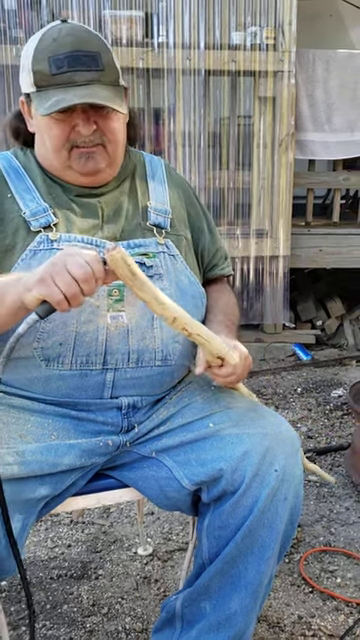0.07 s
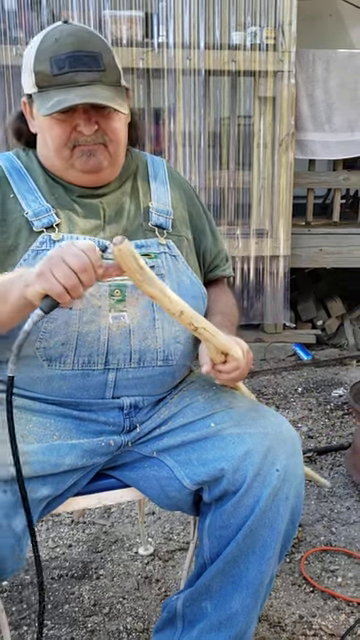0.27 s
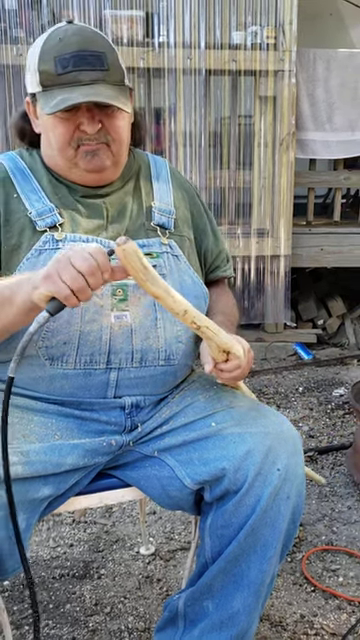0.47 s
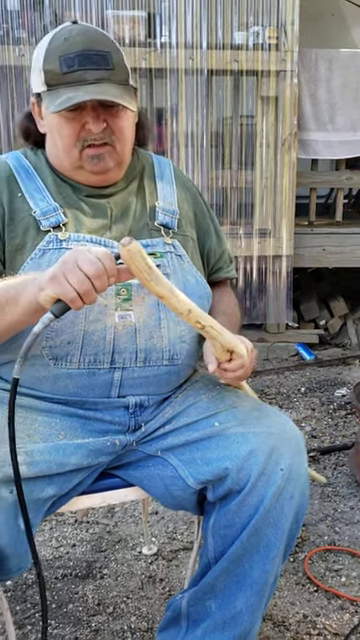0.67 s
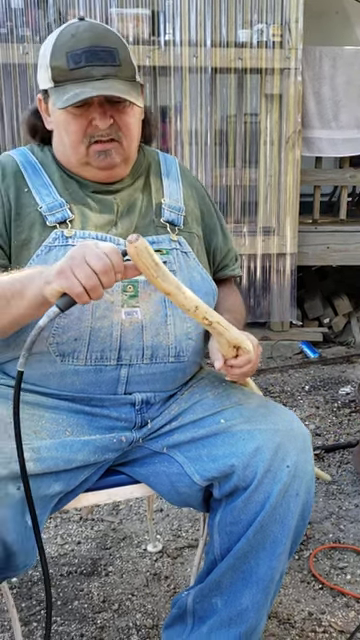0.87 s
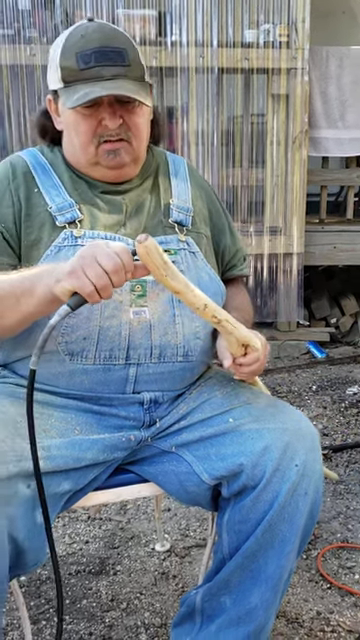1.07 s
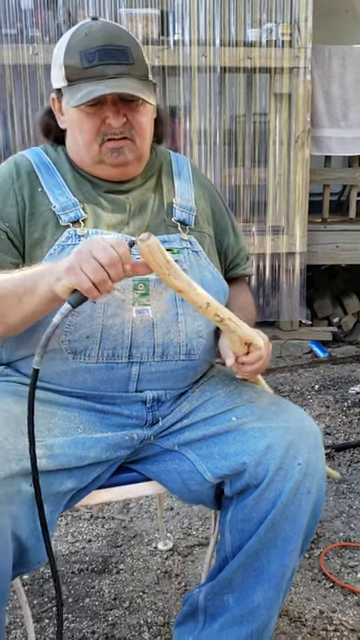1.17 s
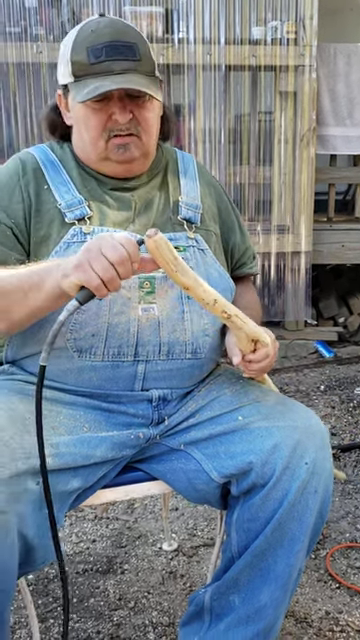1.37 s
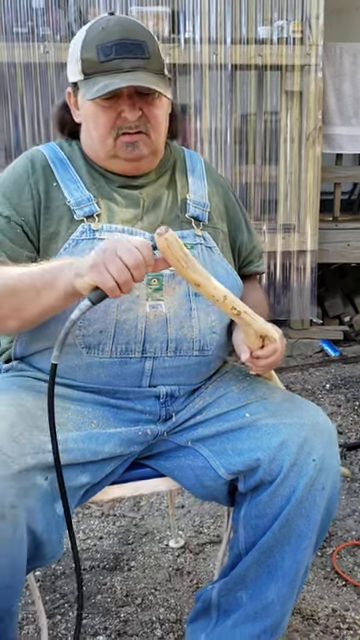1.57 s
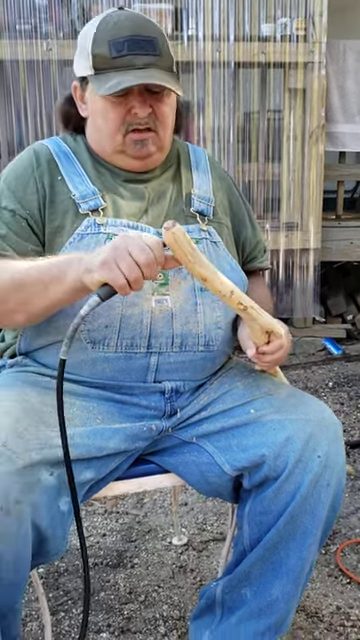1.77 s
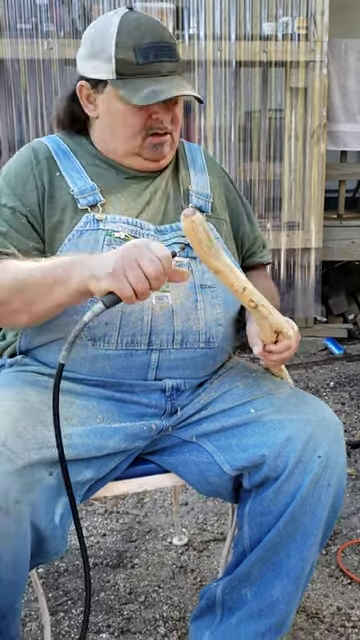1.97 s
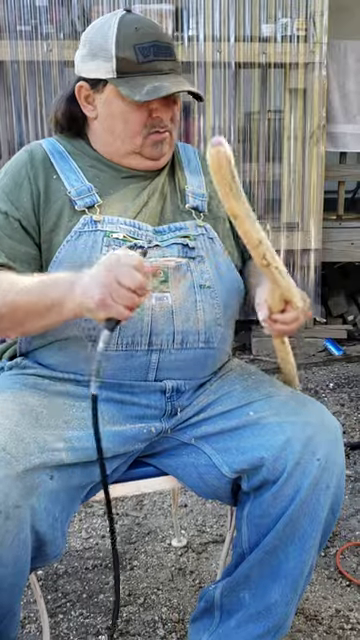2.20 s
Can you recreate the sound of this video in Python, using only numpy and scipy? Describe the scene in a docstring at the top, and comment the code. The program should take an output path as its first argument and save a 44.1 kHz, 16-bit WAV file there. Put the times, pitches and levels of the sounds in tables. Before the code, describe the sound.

A rotary tool grinds a wooden stick outdoors, close and louder on the left. Its steady whine, high fan whistle, airy hiss and shaft rattle run throughout. The gritty scrape squeals around 0.3 s, briefly lightens, then resumes. Sharper squeals come at 1.1 and 1.3 s as the pitch sags slightly; grinding stays hard until about 1.8 s, then eases as the motor speeds up. Faint hum and rumble lie beneath.

```python
"""Outdoors, before two microphones: a rotary tool on a flexible shaft grinds a wooden stick, louder on the left.
The bit scrapes the wood in a pattern that nearly repeats each turn, bites harder now and then, and squeals.
Noise coloured by the wood and the bit makes the scrape; sines at multiples of the shaft speed make the squeals.
The motor whines, its fan sings, and filtered noise makes the air rush and the shaft's rattle in its sheath.
A sine of mains hum and a band of low rumble lie beneath. The shaft speed sags and recovers along a set curve."""
import sys
import numpy as np
from scipy import signal
from scipy.fft import rfft, irfft, next_fast_len
from scipy.io import wavfile
from scipy.ndimage import map_coordinates

SR = 44100
rng = np.random.default_rng(int(sys.argv[2]) if len(sys.argv) > 2 else 0)


def dump(signal):
    """Clip the signal to [-1, 1] and save it as 16-bit WAV at the path in sys.argv[1]."""
    limited = np.clip(np.atleast_2d(signal).T, -1, 1)
    pcm = np.round(limited * 32767).astype(np.int16)
    wavfile.write(sys.argv[1], SR, pcm)


N = 98651

# Shaft speed before flutter. Each row: time in seconds, speed in Hz.
SHAFT_SPEED = [(0.02, 505.7), (0.16, 507.1), (0.25, 504.5), (0.31, 500.0), (0.345, 494.1), (0.55, 493.9),
               (0.79, 495.7), (0.88, 494.1), (1.05, 496.0), (1.1, 492.9), (1.27, 492.0), (1.335, 481.2),
               (1.4, 479.0), (1.5, 480.2), (1.59, 478.5), (1.73, 481.4), (1.81, 479.8), (2.22, 497.3)]
FLUTTER_HZ, FLUTTER_KNOTS_PER_S = 0.385, 35

# Pressure of the bit on the wood. Each row: time in seconds, level in dB.
PRESSURE_LEVEL = [(0, -10), (.1, -4), (.22, -4), (.27, -6), (.34, -24), (.41, 0.5), (.5, 1), (.57, -8.5),
                  (.68, -2.5), (.8, -1.5), (.92, -1.5), (1.08, -1.5), (1.19, 2), (1.3, -3.5), (1.42, 3),
                  (1.53, 0.5), (1.64, 0), (1.76, 0.5), (1.87, -2.5), (1.98, -3), (2.08, -10), (2.24, -15)]
# Harder bites. Each row: centre in seconds, half length in seconds (power down to 1/e), wood in dB, bit in dB.
HARD_BITES = [(0.311, 0.03, 8, 10.5), (0.373, 0.0065, 4, 8), (0.473, 0.0091, 4, -8),
              (0.634, 0.0088, 0, 7.5), (0.866, 0.01, -5, 5), (1.075, 0.016, 6, 5.5), (1.3, .021, 8, 8),
              (1.353, 0.011, 8, 6.5), (1.779, 0.011, 4, 9.5)]
# Scrape in the wood at 0 dB drive, near the left microphone. Each row: frequency in Hz, level in dB per Hz.
WOOD_SPECTRUM = [(900, -105), (1550, -76), (1920, -72), (2400, -73), (2700, -70.5), (3000, -74.5),
                 (3500, -73), (4000, -71), (4600, -80.5), (5500, -84), (6200, -105)]
# Scrape in the bit at 0 dB drive, near the left microphone. Each row: frequency in Hz, level in dB per Hz.
BIT_SPECTRUM = [(4500, -105), (5900, -89), (6500, -75), (7000, -74.5), (7600, -85.5), (8400, -77.5),
                (9400, -79.5), (10200, -77.5), (11200, -81), (12400, -95.5), (13200, -81), (13750, -87.5),
                (14200, -84), (14900, -81.5), (16000, -94)]
# Scrape at the right microphone. Each row: frequency in Hz, right minus left in dB.
SCRAPE_SHADE = [(2000, -8), (3000, -11), (3500, -45), (4200, -2), (5000, -14), (6500, -6.5), (6950, -13.5),
                (7600, -29), (10300, -18.5), (12500, -17), (13800, 6), (15000, -18)]
# Buzz of the scrape at 0 dB pressure, before waver.
# Each row: multiple of shaft speed, left level in dB, right level in dB, left lead in radians.
BUZZ_TONES = [(6, -47, -60, -1.2), (7, -45.5, -58, 2), (8, -48.5, -73, -4.7), (9, -54, -57, 1.3)]
# Bit resonances at 0 dB ringing.
# Each row: centre in Hz, half width in Hz (amplitude halved), left peak in dB per Hz.
BIT_RESONANCES = [(6440, 96, -70.5), (7110, 250, -64.5), (13800, 300, -72)]
# The bit's ringing. Each row: time in seconds, level in dB.
RINGING_LEVEL = [(0, -40), (.2, -7.5), (.3, 0.5), (.4, -8), (.5, -4), (.57, -21), (.65, -12.5), (.85, -7),
                 (.95, -14), (1.08, -2.5), (1.19, -13), (1.32, -3), (1.4, -24)]
# Ringing at the right microphone. Each row: frequency in Hz, right minus left in dB.
RINGING_SHADE = [(6480, -5), (6950, -8), (13830, -4)]
# Squeals of the bit on the wood, before waver. Each row: start in seconds, end in seconds,
# multiple of shaft speed, left level in dB, right level in dB, slip in cycles.
SQUEAL_EVENTS = [(0, 0.046, 4, -45, -50, .03), (0.25, .345, 7, -36.5, -54, .02),
                 (0.255, 0.33, 13, -40, -58, .07), (.255, .32, 9, -42, -58, .03),
                 (.275, .34, 8, -38.5, -50, .02), (0.289, 0.337, 6, -34, -44, .02),
                 (.46, 0.525, 6, -41, -58, 0.023), (1.056, 1.168, 7, -37.5, -57, .04),
                 (1.17, 1.33, 28, -50, -47, .38), (1.22, 1.236, 14, -39, -55, .05),
                 (1.284, 1.322, 6, -32.5, -49, .02), (1.29, 1.327, 7, -36.5, -56, .04),
                 (1.302, 1.374, 8, -41, -58, 0.12), (1.337, 1.372, 14, -39, -47, 0.2),
                 (1.623, 1.662, 7, -33.5, -52, .04), (1.5, 1.71, 14, -41, -49.5, 0.036),
                 (1.717, 1.863, 14, -48, -52, 0.15), (1.769, 1.786, 8, -31, -50, 0.036),
                 (1.96, 2.04, 4, -45.5, -50, .03)]
SQUEAL_RISE_S, SLIP_KNOTS_PER_S = 0.011, 60

# Lesser motor tones, before waver. Each row: multiple of shaft speed, left level in dB, right level in dB,
# left lead in radians, unsteadiness in dB (its sign only flips the random waver).
MOTOR_TONES = [(1, -63, -67, 0.47, 3), (3.91, -62.5, -53, 0.6, 3), (4, -93, -59.5, 1, -3),
               (4.09, -65.5, -56.5, -0.1, 6), (5, -51.5, -51.5, 4.5, 4)]
# Main whine at twice the shaft speed. Each row: time in seconds, left level in dB.
WHINE_LEVEL = [(0, -45.5), (.28, -48), (.4, -45), (.8, -46), (1.15, -43), (1.33, -47.5), (1.88, -47.5),
               (2.24, -49)]
WHINE_RIGHT_DB, WHINE_LEAD_RAD = -11, -2.07  # right minus left; left lead
# Overtone at three times the shaft speed, before waver.
# Each row: time in seconds, left level in dB, right level in dB.
OVERTONE_LEVELS = [(0, -40.5, -45.5), (.25, -38, -42.5), (.34, -51, -49.5), (.6, -49.5, -49),
                   (.72, -42.5, -45), (1.5, -44.5, -45.5), (1.95, -45, -47), (2.24, -43, -45)]
OVERTONE_LEAD_RAD, OVERTONE_WAVER_DB = 3.37, 5
# Fan whistle. Each row: time in seconds, left level in dB.
FAN_LEVEL = [(0, -40), (.45, -40.5), (1.05, -38), (1.25, -37.5), (1.37, -35.5), (1.7, -36.5), (1.83, -40.5),
             (2.02, -37), (2.24, -40)]
FAN_BLADES, FAN_RIGHT_DB, FAN_LEAD_RAD = 18, -14, 1  # right minus left; left lead
# Rush of air at the left microphone. Each row: frequency in Hz, level in dB per Hz.
AIR_SPECTRUM = [(150, -90), (270, -85), (420, -92.5), (590, -84), (720, -89), (1700, -84.5), (3000, -86.5),
                (5200, -84), (5950, -90.5), (6400, -85.5), (7000, -81.5), (8000, -77), (10200, -79),
                (11500, -86), (14200, -87), (15200, -80.5), (16000, -79)]

# Shaft rattle at 0 dB chatter, at the left microphone. Each row: frequency in Hz, level in dB per Hz.
RATTLE_SPECTRUM = [(400, -100), (1050, -84.5), (1350, -82), (1640, -80), (1880, -74.5), (2150, -76),
                   (2380, -70), (2700, -79.5), (2900, -72), (3400, -73), (3670, -65.5), (3900, -72.5),
                   (4450, -77), (5200, -86.5), (5900, -94), (9000, -100)]
# Shaft chatter before its random flicker. Each row: time in seconds, level in dB.
CHATTER_LEVEL = [(0, 4.5), (.2, 1.5), (.45, 1.5), (.56, 0), (.61, -2), (.69, 2), (.85, -1.5), (.95, 3.5),
                 (1.15, 0.5), (1.6, 0.5), (1.86, 2), (2.05, 2.5), (2.24, 0)]

# Air, rattle and rumble at the right microphone. Each row: frequency in Hz, right minus left in dB.
BODY_SHADE = [(200, -1), (700, -4.5), (1300, 0.5), (2200, -9), (3000, -8), (3600, -17.5), (5000, -6.5),
              (6000, 1), (8000, -21), (10500, -7), (13000, -4.5), (15200, -8)]
# Likeness of the two microphones. Each row: frequency in Hz, shared share of amplitude from 0 to 1.
LIKENESS = [(100, 0.85), (1400, 0.9), (2500, 0.55), (5000, 0.23), (9000, 0.2), (15000, 0.34)]
LEFT_LAG_S = 0.00025  # noise travels about 9 cm further to the left microphone

# Rumble at 0 dB swell, at the left microphone. Each row: frequency in Hz, level in dB per Hz.
RUMBLE_SPECTRUM = [(28, -118), (40, -90), (52, -93), (65, -71), (80, -89.5), (110, -83.5), (170, -106.5),
                   (400, -105)]
# Swell of the rumble. Each row: time in seconds, level in dB.
RUMBLE_SWELL = [(0, -0.5), (.95, -8), (1.35, 3.5), (1.82, 1.5), (1.91, 11.5), (2.24, -1)]
HUM_HZ, HUM_LEFT_DB, HUM_RIGHT_DB = 120.6, -57.5, -3.5  # the last is right minus left
TOP_HZ = 15780


def amp(db):
    """Decibels to amplitude gain."""
    return 10 ** (np.asarray(db) / 20)


def along(points, hz):
    """Values of a frequency table, joined by lines on a log axis."""
    f, v = np.transpose(points)
    return np.interp(np.log(hz + 1), np.log(f + 1), v)


def clock():
    """Time of every sample in seconds."""
    return np.arange(N) / SR


def curve(rows):
    """Values of a time table, joined by straight lines."""
    return np.interp(clock(), *np.transpose(rows))


def wobble(rate):
    """A smooth random curve through `rate` knots a second."""
    return map_coordinates(rng.standard_normal(4096), [clock() * rate], mode="wrap")


def filtered(x, response):
    """Multiply the spectrum of x by a response of frequency."""
    m = next_fast_len(N + 8192)
    return irfft(rfft(x, m) * response(np.fft.rfftfreq(m, 1 / SR)), m)[..., :N]


def placed(pair, spectrum, shade):
    """Colour two noises; the right microphone hears the first early and shaded, mixed with the scattered second."""
    per_hz = pair * np.sqrt(SR / 2)  # white noise at 0 dB per Hz
    direct, scattered = filtered(per_hz, lambda hz: amp(along(spectrum, hz)))

    def shared(hz):
        """The direct sound, early at the right."""
        return along(LIKENESS, hz) * np.exp(2j * np.pi * hz * LEFT_LAG_S)

    right = filtered(direct, shared)
    right += filtered(scattered, lambda hz: np.sqrt(1 - along(LIKENESS, hz) ** 2))
    return np.array([direct, filtered(right, lambda hz: amp(along(shade, hz)))])


def tone(cycles, left_db, right_db, lead):
    """One sine at the two microphones, with RMS levels in dB and the left ahead by `lead` radians."""
    angle = 2 * np.pi * (cycles + rng.random())
    left = amp(left_db) * np.sin(angle)
    right = amp(right_db) * np.sin(angle - lead)
    return np.sqrt(2) * np.array([left, right])


def contact():
    """Drive of the wood and the bit: steady pressure and brief bites add as power."""
    wood = bit = amp(curve(PRESSURE_LEVEL)) ** 2
    for centre, half_s, wood_db, bit_db in HARD_BITES:
        bite = np.exp(-((clock() - centre) / half_s) ** 2)
        wood = wood + bite * amp(wood_db) ** 2
        bit = bit + bite * amp(bit_db) ** 2
    return np.sqrt(wood), np.sqrt(bit)


def scrape(turns, memory, swing_db, size=96):
    """The burr's teeth leave nearly the same scratch pattern every turn, strongest where the bit runs out of true."""
    fresh = rng.standard_normal((2, 2048, size))  # microphone noise pair, turn, point of the turn
    pattern = signal.lfilter([np.sqrt(1 - memory ** 2)], [1, -memory], fresh, axis=1)
    pattern = pattern[:, ::-1].reshape(2, -1)  # reversed: the filter's quiet start falls on unused turns
    rubbing = amp(swing_db * np.cos(2 * np.pi * turns))
    scratches = np.array([map_coordinates(p, [turns * size]) for p in pattern])
    return scratches * rubbing / np.sqrt(np.mean(rubbing ** 2))


def grinding(turns, wood, bit, grain_db):
    """The scrape sounds in the wood's middle range and in the bit's treble."""
    grain = amp(grain_db * wobble(120))
    wood_scrape = scrape(turns, memory=0.83, swing_db=7) * wood * grain
    bit_scrape = scrape(turns, memory=0.71, swing_db=2.5) * bit * grain
    return placed(wood_scrape, WOOD_SPECTRUM, SCRAPE_SHADE) + placed(bit_scrape, BIT_SPECTRUM, SCRAPE_SHADE)


def buzz(turns, waver_db, slip):
    """The bit runs slightly out of true, so its rubbing buzzes in step with the shaft, give or take `slip` cycles."""
    out = np.zeros((2, N))
    for multiple, left_db, right_db, lead in BUZZ_TONES:
        waver = waver_db * wobble(30.2)
        cycles = multiple * turns + slip * wobble(41.43)
        out += tone(cycles, left_db + waver, right_db + waver, lead)
    return out


def ringing(turns):
    """The scrape keeps the bit's narrow resonances singing."""
    hz = np.linspace(0, SR / 2, 2048)
    gain = sum(amp(db) / (1 + ((hz - centre) / width) ** 2) for centre, width, db in BIT_RESONANCES)
    spectrum = np.column_stack([hz, 20 * np.log10(gain)])
    drive = scrape(turns, memory=0.89, swing_db=1.5) * amp(curve(RINGING_LEVEL))
    return placed(drive, spectrum, RINGING_SHADE)


def squeal(turns, waver_db):
    """A resonance of the bit or the stick locks on to one multiple of the shaft speed; slipping roughens it."""
    t, out = clock(), np.zeros((2, N))
    for start, end, multiple, left_db, right_db, slip in SQUEAL_EVENTS:
        nearest_edge = np.minimum(t - start, end - t)
        level = np.clip(nearest_edge / SQUEAL_RISE_S + .5, 0, 1)  # half level at start and end
        waver = waver_db * wobble(61.0)
        cycles = multiple * turns + slip * wobble(SLIP_KNOTS_PER_S)
        out += level * tone(cycles, left_db + waver, right_db + waver, lead=0.8)
    return out


def motor(turns):
    """The two-pole motor's whine and lesser shaft tones, the fan's high whistle and its rush of air."""
    out = placed(rng.standard_normal((2, N)), AIR_SPECTRUM, BODY_SHADE)
    for multiple, left_db, right_db, lead, unsteady_db in MOTOR_TONES:
        waver = unsteady_db * wobble(22.33)
        out += tone(multiple * turns, left_db + waver, right_db + waver, lead)
    whine_db = curve(WHINE_LEVEL)
    out += tone(2 * turns, whine_db, whine_db + WHINE_RIGHT_DB, WHINE_LEAD_RAD)
    s, left_db, right_db = np.transpose(OVERTONE_LEVELS)
    waver = OVERTONE_WAVER_DB * wobble(24.3)
    overtone_left = np.interp(clock(), s, left_db) + waver
    overtone_right = np.interp(clock(), s, right_db) + waver
    out += tone(3 * turns, overtone_left, overtone_right, OVERTONE_LEAD_RAD)
    fan_db = curve(FAN_LEVEL)
    return out + tone(FAN_BLADES * turns, fan_db, fan_db + FAN_RIGHT_DB, FAN_LEAD_RAD)


def shaft(chatter_db):
    """The flexible shaft chatters in its sheath and rings the handpiece: flickering noise in resonant colours."""
    chatter = amp(curve(CHATTER_LEVEL) + chatter_db * wobble(350))
    return placed(rng.standard_normal((2, N)) * chatter, RATTLE_SPECTRUM, BODY_SHADE)


def background():
    """Mains hum as one sine, and low-band noise as a rumble that swells and ebbs."""
    rumble = placed(rng.standard_normal((2, N)), RUMBLE_SPECTRUM, BODY_SHADE) * amp(curve(RUMBLE_SWELL))
    return rumble + tone(HUM_HZ * clock(), HUM_LEFT_DB, HUM_LEFT_DB + HUM_RIGHT_DB, lead=0.14)


def scene():
    """One shaft speed drives the scrape, the squeals and the motor's tones; rattle and background join them."""
    speed_hz = curve(SHAFT_SPEED) + FLUTTER_HZ * wobble(FLUTTER_KNOTS_PER_S)
    turns = np.cumsum(speed_hz) / SR
    wood, bit = contact()
    cut = grinding(turns, wood, bit, grain_db=1.65)
    cut += amp(curve(PRESSURE_LEVEL)) * buzz(turns, waver_db=3.2, slip=0.055)
    singing = ringing(turns) + squeal(turns, waver_db=1.5)
    return cut + singing + motor(turns) + shaft(chatter_db=2.0) + background()


def record(dry):
    """The two microphone channels keep nothing from the band limit up."""
    return filtered(dry, lambda hz: hz < TOP_HZ)


dry = scene()
out = record(dry)
dump(out)
```